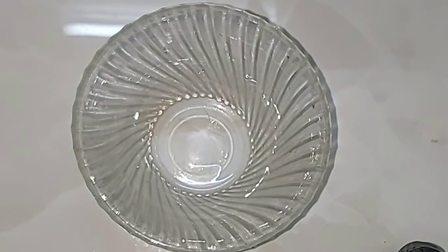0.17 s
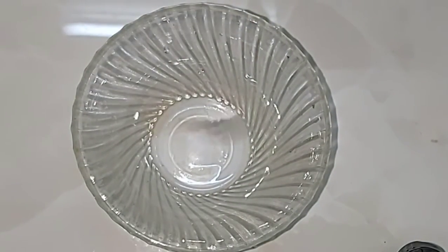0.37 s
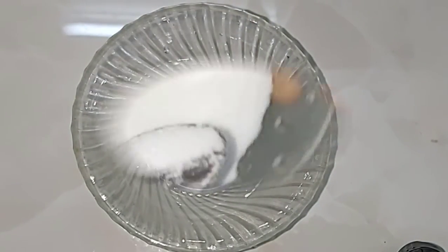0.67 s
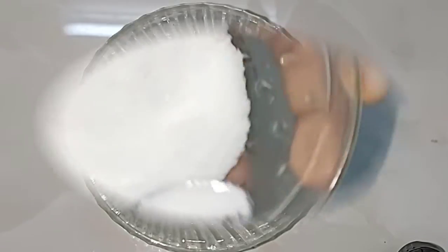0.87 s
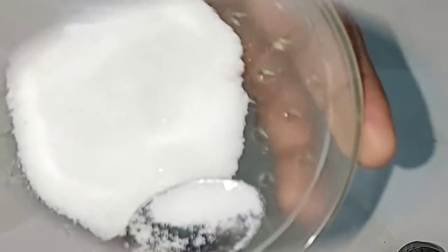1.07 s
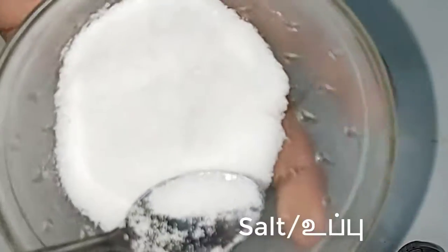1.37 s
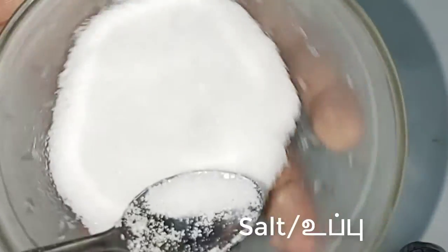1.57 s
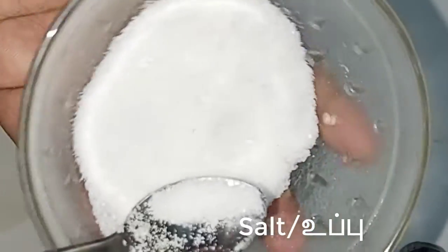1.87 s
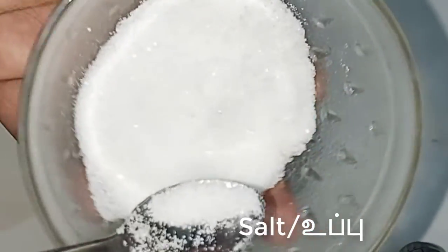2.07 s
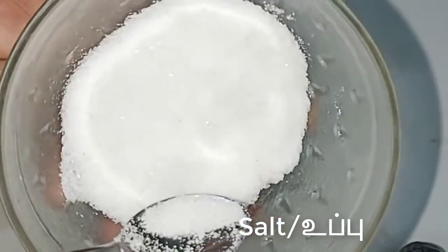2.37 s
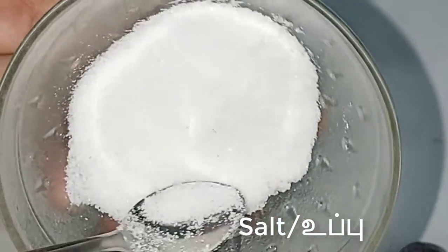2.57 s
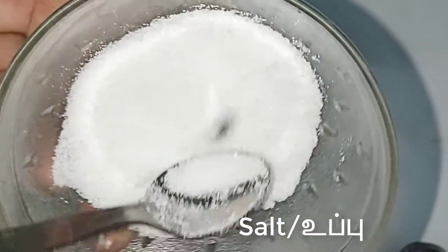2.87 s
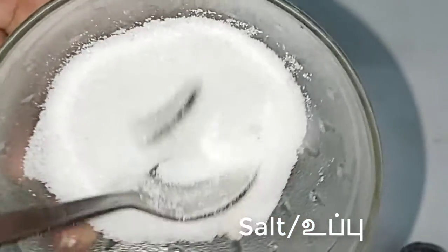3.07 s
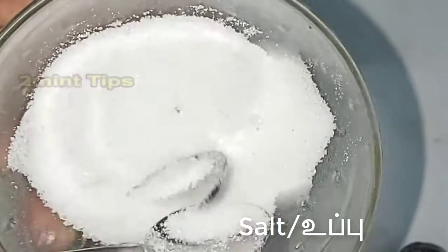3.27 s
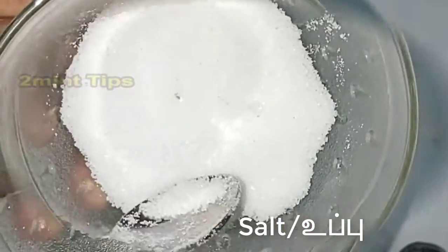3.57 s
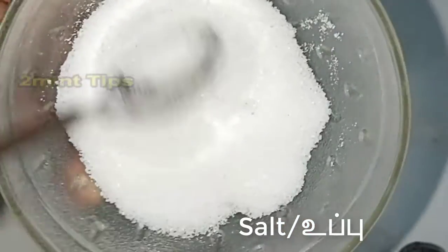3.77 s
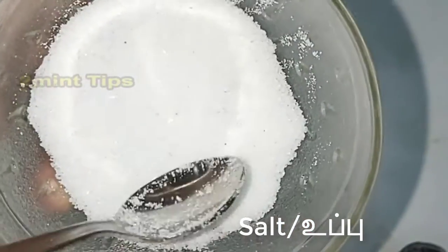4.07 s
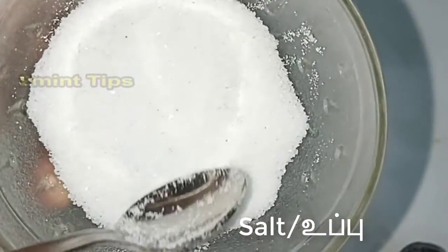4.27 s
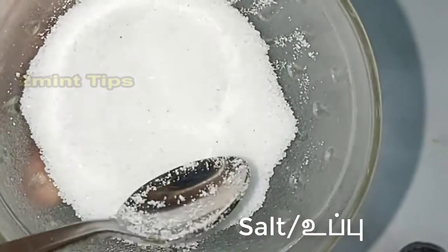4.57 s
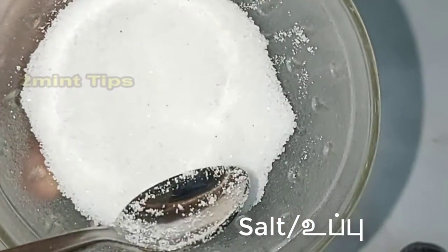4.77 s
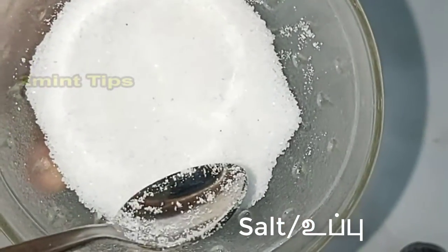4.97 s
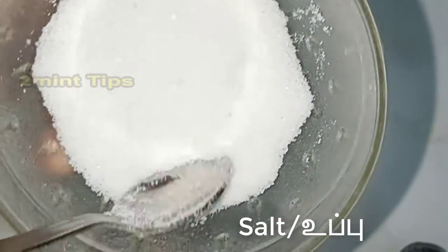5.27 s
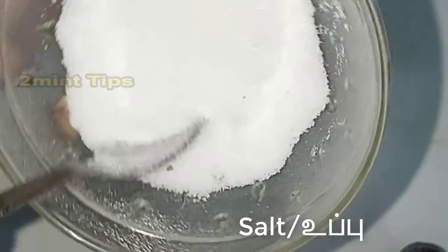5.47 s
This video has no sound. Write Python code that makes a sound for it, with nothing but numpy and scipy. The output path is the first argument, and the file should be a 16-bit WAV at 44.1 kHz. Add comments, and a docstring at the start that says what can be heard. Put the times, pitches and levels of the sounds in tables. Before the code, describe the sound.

Salt slides softly in a hand-held glass bowl, then a metal spoon gives sharp, briefly ringing clinks over a faint low rumble.

```python
"""Indoors, in a hard room, a phone's two microphones close to a hand-held glass bowl of salt.
Salt slides across the glass and the hand bumps softly on it. A steel spoon knocks the rim, each knock
ringing on in the room, and salt hisses past the spoon. Far traffic and a drone come in from outside.
The microphone hiss sinks after the loudest knock, and twice the level dips for an instant."""
import sys
import numpy as np
from scipy.fft import rfft, irfft, next_fast_len
from scipy.io import wavfile
from scipy.ndimage import uniform_filter1d, map_coordinates

SR = 44100
rng = np.random.default_rng(int(sys.argv[2]) if len(sys.argv) > 2 else 0)


def output_pcm(signal):
    """Save a mono or channel-first signal as 16-bit PCM at the path in sys.argv[1].

    Samples are clipped to [-1, 1] before scaling.
    """
    pcm = np.clip(np.atleast_2d(signal).T, -1, 1) * 32767
    wavfile.write(sys.argv[1], SR, np.round(pcm).astype(np.int16))


N = 248283

# microphone hiss over time: time_s, level_db
MIC_HISS_LEVELS = [(0, -66), (.2, -67.5), (.8, -60), (1.1, -57.5), (1.78, -60), (1.9, -76), (2.3, -71.5),
                   (3.0, -69.5), (3.26, -62.5), (3.3, -59.5), (5.63, -58.5)]
# its spectrum: freq_hz, level_db
MIC_HISS_SPECTRUM = [(470, -19.5), (800, -7), (1130, -9.5), (1490, -8.5), (1680, -11.5), (2440, -13.5),
                     (3100, -17), (4120, -17.5), (6600, -25), (13600, -14.5), (15500, -21)]
# far traffic over time: time_s, rumble_db, boom_db, hollow_db
TRAFFIC_LEVELS = [(0, -70.5, -74, -71.5), (.22, -58, -82, -67.5), (.32, -45, -70.5, -68.5),
                  (.76, -46.5, -57.5, -60.5), (.79, -56, -62, -63.5), (1.2, -57, -63.5, -64),
                  (1.5, -57, -76.5, -65.5), (1.78, -52, -56, -62), (1.95, -70.5, -80, -78),
                  (2.55, -76.5, -82, -79.5), (3.0, -58.5, -64, -63.5), (3.22, -58.5, -72, -66),
                  (3.28, -64, -69, -67.5), (3.52, -47, -51.5, -53), (3.9, -48, -52, -55),
                  (4.3, -48, -51, -52.5), (4.62, -38.5, -44.5, -53.5), (4.95, -47.5, -52.5, -56),
                  (5.3, -48.5, -50.5, -56), (5.63, -46.5, -55, -56.5)]
# the room's rumble, a deep and an upper group: pitch_hz, width_hz, level_db
RUMBLE_MODES = [
    [(62, 30, -10.5), (75.4, 12, -1.5)],
    [(94.3, 16, -0.5), (154.3, 15, 0)],
]
# the room's hollow mids, a lower and an upper group: pitch_hz, width_hz, level_db
HOLLOW_MODES = [
    [(312, 87.7, 0.5), (406, 130, -1), (492, 49, -0.5)],
    [(671, 180, 0)],
]
# the drone outside: time_s, level_db
DRONE_LEVELS = [(0.0, -84), (0.55, -53.5), (0.61, -63.5), (1.14, -60.5), (1.24, -79), (1.74, -51.5),
                (1.83, -82), (2.59, -88), (3.0, -47.5), (3.25, -79), (3.43, -50), (3.56, -52), (3.65, -42),
                (3.84, -61), (4.44, -39), (4.47, -34), (4.64, -23), (5.03, -51.5), (5.3, -44),
                (5.44, -53.5), (5.49, -47.5), (5.63, -61.5)]
# surges of sliding salt: peak_s, rise_db_per_s, hold_s, fall_db_per_s, hiss_db, scuff_db, trickle_db
SALT_SLIDES = [(.14, 41, 0.046, 60, -76, -76.5, -70), (.365, 142, 0.017, 73, -57.5, -64, -48),
               (.5, 285, .02, 268, -47, -59.5, -38), (.53, 300, 0.033, 201, -38, -49.5, -52)]
# bright hiss of the grains: freq_hz, level_db
GRAIN_SPECTRUM = [(2000, -38), (3000, -21), (3650, -12), (4250, 1), (4650, -5.5), (5500, -1.5), (6300, -7),
                  (7340, -2.5), (10500, -6.5), (12500, -2.5), (15600, -7.5)]
# their dull scuff: freq_hz, level_db
SCUFF_SPECTRUM = [(500, -10.5), (1000, -5.5), (1650, -1), (1950, 2), (2300, -4), (3000, -7.5), (4500, -22)]
# their thin trickle: freq_hz, level_db
TRICKLE_SPECTRUM = [(4000, -18.5), (6500, -4), (7300, 3), (7800, -2), (8700, -5), (11000, -4.5),
                    (15600, -12)]
# hand on the bowl: peak_s, hold_s, deep_rumble_db, upper_rumble_db, boom_db, hollow_db, upper_hollow_db
HAND_BUMPS = [(.33, 0.047, -41, -40, -62, -65, -87), (.47, .01, -43.5, -43, -65, -64.5, -75),
              (.578, .01, -45.5, -43, -47.5, -62, -56), (.72, .04, -42, -46, -54, -62.5, -66.5),
              (.94, .02, -45.5, -49, -61.5, -49.5, -75.5), (1.13, .03, -55, -49.5, -60, -64.5, -75),
              (1.29, .01, -51, -55.5, -78.5, -77, -74.5), (1.57, .03, -47, -44.5, -50, -42.5, -69.5),
              (1.68, .02, -46.5, -51, -54, -65, -70), (1.74, .04, -55, -47.5, -51.5, -45.5, -71.5),
              (2.4, .01, -57.5, -66, -84.5, -85, -95), (3.11, .005, -48, -48, -57.5, -42.5, -55),
              (3.65, .02, -46, -47, -49, -56, -72), (3.77, .04, -50, -51, -53.5, -55.5, -48),
              (4.05, .04, -44.5, -48, -51.5, -53.5, -62), (4.22, .04, -54, -53.5, -46.5, -47, -74),
              (4.66, .02, -46, -43.5, -42, -44, -67.5), (4.78, .02, -43, -45.5, -46, -53.5, -54.5),
              (5.04, .02, -41, -47, -45.5, -57.5, -63), (5.25, .02, -53, -50.5, -39, -59, -68),
              (5.49, .03, -35, -41.5, -38.5, -59.5, -52), (5.54, .005, -48.5, -44, -50, -53, -44)]
# spoon on the rim: start_s, crack_db, thud_db, thud_rise_s, left_over_right_db
RIM_KNOCKS = [(0.8321, -12, -14.5, 0.00078, -7.5), (1.7842, 3.5, -14, 0.00054, -7),
              (2.6936, -64, -66, 0.00074, 6), (3.111, -11, -31.5, 0.00071, 13.5),
              (3.2905, -31.5, -42, .0006, 11.5), (5.5145, -53, -29.5, .001, -3.5),
              (5.5357, -46.5, -5, 0.0041, -2)]
# rings of the bowl, with swell and treble loss while the spoon rattles: start_s, rattle_s,
# swell_db_per_s, treble_loss_db_per_s_per_khz, flash_db, grip_factor, length_s, left_over_right_db
BOWL_RINGS = [(.833, 0.092, 169.5, 22, 13.5, 0.83, 0.3, -2.4), (1.784, 0.078, -29, 7.5, 9.5, 0.71, 0.33, 0),
              (2.694, 0.03, -38, -8, -1.5, 1.2, .2, 2.5), (3.11, 0.067, 57.5, 15.5, 9, 0.97, .16, -2.5),
              (5.512, .13, 131.5, 73.5, 3.5, 1.05, .13, 2.1)]
# a row per ring, detuned by grip and salt: pitch_hz of two air resonances and five rim modes
BOWL_PITCHES = [(1480, 3200, 1790, 3745, 6480, 9800, 13900), (1450, 3100, 1880, 3840, 6490, 9920, 13900),
                (1450, 3150, 1850, 3750, 6510, 9880, 13850), (1550, 3500, 2050, 4030, 6570, 9790, 13900),
                (1500, 3150, 1790, 3770, 6490, 9880, 13850)]
# a row per ring, blurred by a harder grip or blow: base_width_hz of the same seven
BOWL_WIDTHS = [(603, 760, 305, 133, 140, 120, 500), (636, 700, 120, 390, 300, 230, 650),
               (650, 1100, 180, 133, 150, 200, 400), (656, 890, 230, 560, 190, 280, 310),
               (507.4, 860, 130, 88, 110, 200, 360)]
# how hard each blow excites the bowl: level_db of the seven resonances, the clatter and the sizzle
STRIKE_LEVELS = [(-44.5, -40.5, -36, -35, -27, -42, -44, -36.5, -40.5),
                 (-30.5, -32.5, -29, -26.5, -24, -17.5, -36, -28.5, -37.5),
                 (-75, -84, -87, -52.5, -71.5, -93, -84, -78, -88),
                 (-45.5, -40, -35.5, -32.5, -22.5, -20.5, -37, -29, -44.5),
                 (-47.5, -85, -47.5, -67.5, -42.5, -57, -73, -72, -45.5)]
# decay of the same nine, before grip and steepening: base_fade_db_per_s
BASE_FADES = [260, 330, 162, 217, 220, 240, 320, 301.2, 350]
# clatter between the bowl's resonances: freq_hz, level_db
CLATTER_SPECTRUM = [(600, -31.5), (900, -19), (1800, -10), (2450, -23.5), (3000, -5.5), (4500, -4),
                    (5600, -4), (7000, 1.5), (7750, -13), (8400, -6.5), (9300, -13.5), (10500, -28)]
# sizzle on top of the clatter: freq_hz, level_db
SIZZLE_SPECTRUM = [(10400, -25), (11050, -8), (11350, 3), (11650, -8), (12300, -6), (13200, -14),
                   (15300, -12), (16000, -16)]
# the steel spoon's own modes: pitch_hz, width_hz, level_db
SPOON_MODES = [(8050, 110, -7), (8720, 130, 0), (11350, 150, -1)]
# the spoon bounces on the glass and feeds the whole ring: peak_s, lift_db, half_length_s
SPOON_BOUNCES = [(0.908, 2, 0.014), (0.933, 0.5, 0.0086), (1.813, 4.5, 0.0037), (1.836, 4.5, .007),
                 (1.874, 4, .005), (3.143, 4.5, 0.0075), (5.548, 12, 0.0096), (5.627, 8, 0.018)]
# spoon through salt: peak_s, rise_db_per_s, hold_s, fall_db_per_s, hiss_db, scuff_db, singing_db
SPOON_STROKES = [(1.77, 297, .002, 3000.5, -48.5, -43, -52), (3.097, 330.5, .002, 3005, -56, -51, -53.5),
                 (3.292, 3005, 0.0017, 327.5, -55.5, -50, -68.5), (3.94, 701, 0.034, 111, -67, -63.5, -53),
                 (5.45, 220, 0.11, 100, -64, -58, -47)]
# pulses of a faint whine: peak_s, rise_db_per_s, hold_s, fall_db_per_s, level_db
WHINE_PULSES = [(4.63, 249, 0.036, 150.5, -55), (4.76, 250, 0.018, 200, -49.5),
                (4.855, 302, .01, 178, -52.5)]
# brief dips in level: start_s, length_s, gain_db
LEVEL_DIPS = [(0.775, .012, -12), (3.2771, 0.0053, -4.5)]


def amp(db):
    """Decibels to gain."""
    return 10 ** (np.asarray(db) / 20)


def unit(x):
    """Scaled to rms 1."""
    return x / np.sqrt(np.mean(x ** 2) + 1e-20)


def pan(db):
    """Gains of the two microphones, left over right by db."""
    return amp([[db / 2], [-db / 2]])


def shape(points):
    """A response through (freq_hz, level_db) points on a log axis."""
    freq_hz, level_db = np.transpose(points)
    return lambda hz: amp(np.interp(np.log(hz + 1), np.log(freq_hz + 1), level_db, -120, -120))


def modes(rows, power=1):
    """A sum of (pitch_hz, width_hz, level_db) resonances; a power above 1 narrows them."""
    return lambda f: sum((-1) ** k * amp(db) * 1j * f * width / (hz * hz - f * f + 1j * f * width)
                         for k, (hz, width, db) in enumerate(rows)) ** power


def filtered(x, response):
    """x through a frequency response."""
    size = next_fast_len(x.shape[-1] + 8192)
    return irfft(rfft(x, size) * response(np.fft.rfftfreq(size, 1 / SR)), size)[..., :x.shape[-1]]


def noise(response, size=N, alike=0, pan_db=0):
    """Stereo noise of rms 1; alike is the correlation between the microphones."""
    a, b = filtered(rng.standard_normal((2, size)), response)
    angle = np.arccos(alike) / 2
    mid, side = np.cos(angle) * a, np.sin(angle) * b
    return unit(np.array([mid + side, mid - side]) * pan(pan_db))


def curves(rows):
    """One value per sample for each column after the time."""
    times, *columns = np.transpose(rows)
    return [np.interp(np.arange(N) / SR, times, column) for column in columns]


def swells(rows):
    """Each row rises, holds and falls; one gain curve for each level column."""
    t, power = np.arange(N) / SR, 0
    for peak, rise, hold, fall, *levels in rows:
        down_db = rise * np.maximum(peak - t, 0) + fall * np.maximum(t - peak - hold, 0)
        power += amp(np.array(levels)[:, None] - down_db) ** 2
    return np.sqrt(power)[:, None]


def wobble(knots_per_s):
    """A smooth random curve."""
    return map_coordinates(rng.standard_normal(N // 100), [np.arange(N) * knots_per_s / SR])


def microphone_hiss():
    """Broad noise, unrelated at the two microphones, that sinks and creeps back."""
    return amp(curves(MIC_HISS_LEVELS)[0]) * noise(shape(MIC_HISS_SPECTRUM), pan_db=-1.5)


def room_resonances():
    """Noise in the room's low modes: deep and upper rumble, boom, hollow and upper hollow."""
    return [noise(modes(RUMBLE_MODES[0]), alike=0.72, pan_db=-6),
            noise(modes(RUMBLE_MODES[1]), alike=0.69, pan_db=-0.5),
            noise(modes([(224, 30, 0)], power=2), alike=0.82, pan_db=-3.5),
            noise(modes(HOLLOW_MODES[0]), alike=0.4, pan_db=-1),
            noise(modes(HOLLOW_MODES[1], power=1.6), alike=0.19)]


def far_traffic(unsteady_db=2.5):
    """Traffic outside, stronger on the right; each room resonance it excites swells on its own."""
    rumble_db, boom_db, hollow_db = curves(TRAFFIC_LEVELS)
    levels_db = [rumble_db - 0.1, rumble_db - 0.4, boom_db + 1.5, hollow_db + 2, hollow_db - 6]
    return sum(amp(db + unsteady_db * wobble(knots_per_s=11)) * band
               for db, band in zip(levels_db, room_resonances()))


def drone(pitch_hz=251.5):
    """From outside, to the right: a tone whose phase wanders, with a rough fringe."""
    wander = np.cumsum(uniform_filter1d(rng.standard_normal(N), SR // 50)) * 0.012
    tone = np.sin(2 * np.pi * pitch_hz * np.arange(N) / SR + wander) * pan(-12)
    fringe = noise(modes([(pitch_hz, 30, 0)], power=2), alike=0.82, pan_db=-10.5)
    return amp(curves(DRONE_LEVELS)[0] + 2.5) * unit(unit(tone) + amp(-4) * fringe)


def salt_grains():
    """Dense moving grains, close up: a bright hiss and a dull scuff."""
    return noise(shape(GRAIN_SPECTRUM), pan_db=1.5) * amp(6.5), noise(shape(SCUFF_SPECTRUM)) * amp(1.5)


def sliding_salt():
    """Salt slides across the tilted bowl in surges, with a thin trickle on top."""
    trickle = noise(shape(TRICKLE_SPECTRUM), pan_db=-2) * amp(6)
    return sum(swells(SALT_SLIDES) * [*salt_grains(), trickle])


def hand_bumps(rise_db_per_s=350.5, fall_db_per_s=299):
    """The hand bumps softly on the bowl and sounds in the room's low resonances."""
    bumps = [(peak, rise_db_per_s, hold, fall_db_per_s, *levels) for peak, hold, *levels in HAND_BUMPS]
    return sum(swells(bumps) * room_resonances())


def rim_knocks(graze_db_per_s=2500, thud_hz=1750):
    """Steel on glass, close up: a graze, then a short crack and a thud of the lowest rim mode."""
    out = np.zeros((2, N + SR))
    t = np.arange(-SR // 200, SR // 20) / SR  # contact is at t = 0
    after = np.maximum(t, 0)
    crack_spectrum = shape([(40, -35), (300, -27.5), (750, -22.5), (1500, -3), (5000, 1.5),
                            (10000, 2.5), (16000, -9.5), (20000, -19.5)])
    graze = amp(-23 + graze_db_per_s * t) * (t < 0)
    impact = (amp(-60 * after / 0.016) + amp(4 - 60 * after / 0.00067)) * (t >= 0)
    for start, crack_db, thud_db, rise, pan_db in RIM_KNOCKS:
        crack = amp(crack_db) * noise(crack_spectrum, len(t), alike=0.068) * (graze + impact)
        attack = 1 - np.exp(-(after / rise) ** 2)
        thud = amp(thud_db - 60 * after / 0.019) * attack * np.sin(2 * np.pi * thud_hz * after)
        out[:, round((start + t[0]) * SR):][:, :len(t)] += pan(pan_db) * (crack + thud)
    return out[:, :N]


def ring_layers(pitches, widths, size, pan_db):
    """Seven resonances, scattered by the room into fluttering bands, then clatter and sizzle."""
    # the right microphone favours the higher resonances
    bands = [noise(modes([(hz, width, 0)], power=3), size, pan_db=pan_db + 4.5 - hz / 1700) * amp(5.5)
             for hz, width in zip(pitches, widths)]
    clatter = noise(shape(CLATTER_SPECTRUM), size, pan_db=pan_db) * amp(6)
    spoon = noise(modes(SPOON_MODES), size, pan_db=3.5) * amp(-17)
    sizzle = noise(shape(SIZZLE_SPECTRUM), size, pan_db=-5)
    return [*bands, clatter + spoon, sizzle]


def bowl_rings(flash_s=0.005, ease_s=0.02, steepen_per_s=4.1, clatter_hz=6000, sizzle_hz=12000):
    """The glass rings while the spoon rattles on it, then fades ever faster in the hand's grip."""
    out, size = np.zeros((2, N + SR)), SR // 2
    t = np.arange(size) / SR
    for ring, levels, pitches, widths in zip(BOWL_RINGS, STRIKE_LEVELS, BOWL_PITCHES, BOWL_WIDTHS):
        start, rattle, swell, treble_loss, flash_db, grip, length, pan_db = ring
        layers = ring_layers(pitches, widths, size, pan_db)
        fading_s = ease_s * np.logaddexp(0, (t - rattle) / ease_s)  # eased time since the rattle ended
        bounce_db = sum(db * np.exp(-((start + t - at) / half) ** 2) for at, db, half in SPOON_BOUNCES)
        lift_db = flash_db * np.exp(-t / flash_s) + bounce_db
        gate = np.clip(np.minimum(t, length - t) / 0.001, 0, 1)
        for layer, db, hz, fade in zip(layers, levels, [*pitches, clatter_hz, sizzle_hz], BASE_FADES):
            rattle_db = (swell - treble_loss * hz / 1000) * (t - fading_s)
            fade_db = grip * fade * fading_s * (1 + steepen_per_s * fading_s)
            out[:, round(start * SR):][:, :size] += gate * amp(db + lift_db + rattle_db - fade_db) * layer
    gap = modes([(2500, 500, 0)])  # the bowl radiates little between its two air resonances
    return filtered(out[:, :N], lambda hz: 1 - 0.75 * gap(hz))


def spoon_strokes():
    """Grains hiss and scuff past the spoon and set its own modes singing."""
    singing = noise(modes(SPOON_MODES, power=1.2), pan_db=-2) * amp(-3.5)
    return sum(swells(SPOON_STROKES) * [*salt_grains(), singing])


def whine():
    """Two faint narrow bands, a little to the left, pulse on the drone's biggest swell."""
    bands = noise(modes([(1475, 100, 0), (2240, 140, -7)], power=2), pan_db=3) * amp(1)
    return swells(WHINE_PULSES)[0] * bands


def scene():
    """Everything that reaches the two microphones."""
    background = microphone_hiss() + far_traffic() + drone() + whine()
    return background + sliding_salt() + hand_bumps() + rim_knocks() + bowl_rings() + spoon_strokes()


def record(dry, top_hz=15700):
    """Twice the level dips briefly; then the phone's ceiling at full scale and its band limit."""
    t, gain = np.arange(N) / SR, np.ones(N)
    for start, length, db in LEVEL_DIPS:
        gain[(t > start) & (t < start + length)] = amp(db)
    clipped = np.clip(dry * gain, -1, 1)
    return filtered(clipped, lambda hz: amp(-25 * (hz > top_hz) - 15 * (hz > 17500)) * (hz > 20))


dry = scene()
out = record(dry)
output_pcm(out)
```